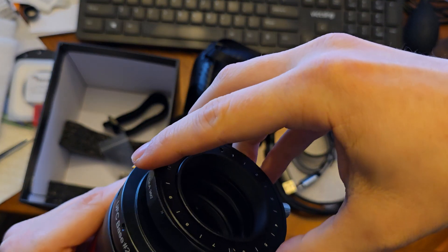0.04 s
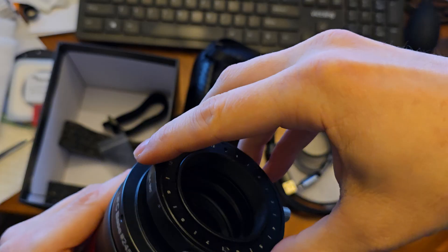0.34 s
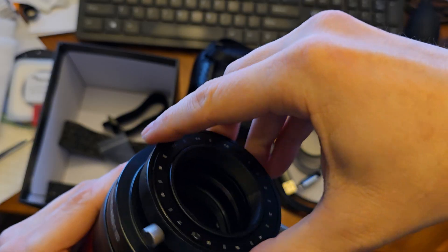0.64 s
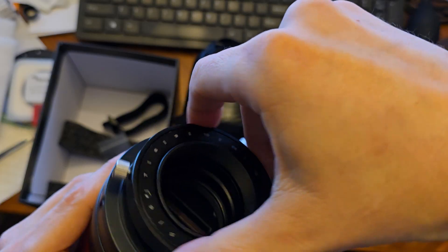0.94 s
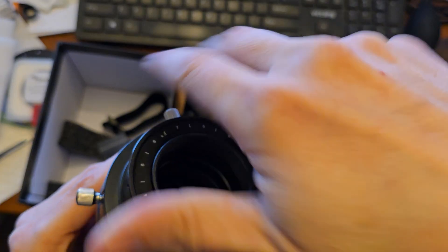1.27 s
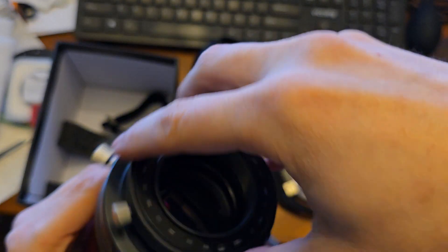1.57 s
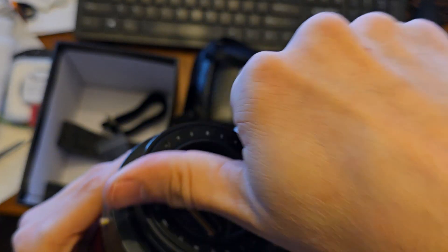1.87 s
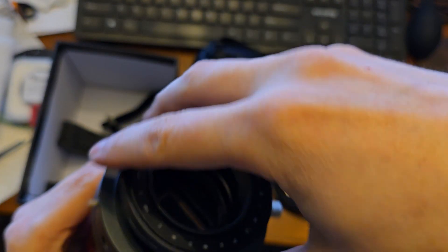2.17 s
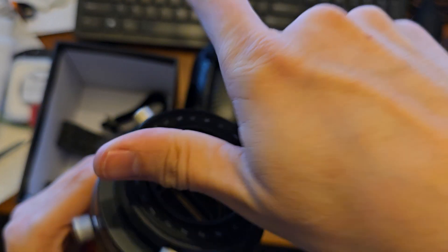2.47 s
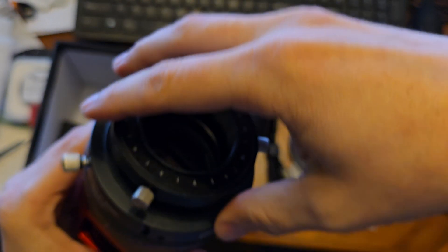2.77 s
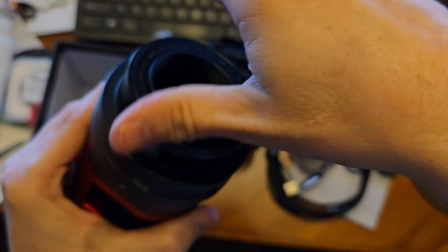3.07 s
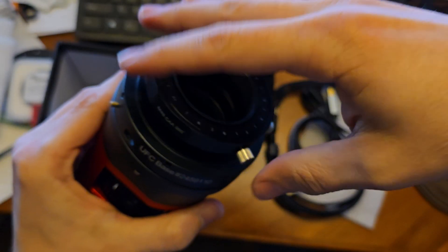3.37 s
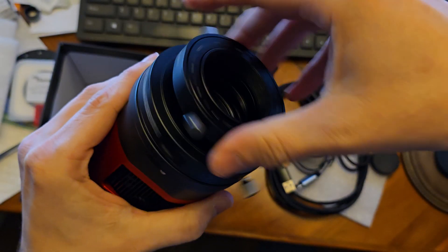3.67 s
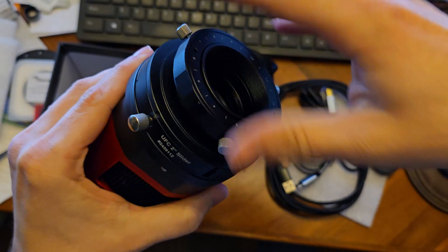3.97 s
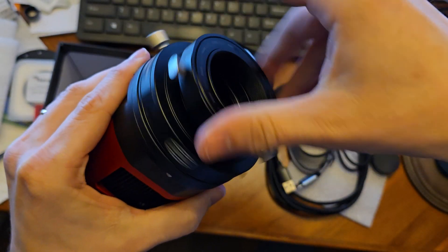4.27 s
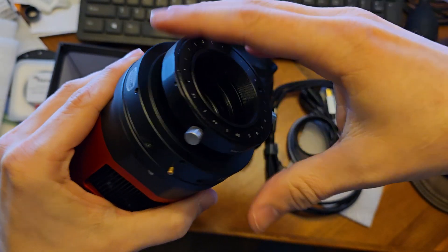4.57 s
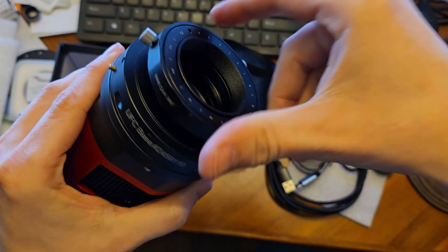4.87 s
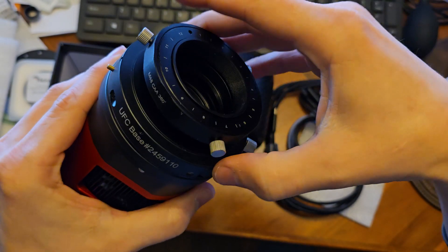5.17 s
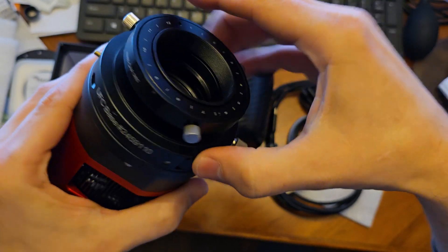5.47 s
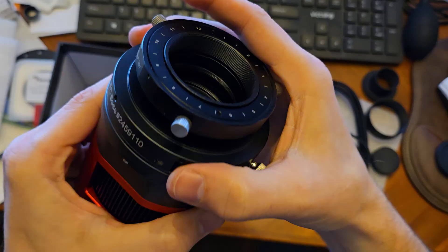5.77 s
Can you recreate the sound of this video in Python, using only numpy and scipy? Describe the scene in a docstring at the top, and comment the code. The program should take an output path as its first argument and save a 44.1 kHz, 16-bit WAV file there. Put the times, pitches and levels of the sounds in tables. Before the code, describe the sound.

Close, dry scraping of a metal ring twisted along its thread stroke after stroke, with small squeaks over a faint fan hum.

```python
"""Fingertips brush and tick on metal over the faint fan hum of a small, quiet room. Threaded adapters are
being screwed together by hand above a desk, close to the microphones of a small stereo camera.
The ring turns in eight strokes, chafing as it catches, then ends with a few short squeaks. Countless tiny
slips in the dry thread rasp, ring the barrel and sound the air in the tube, while the hollow under the
palm hums and groans. Between the later strokes the thumb slides lightly over the rim."""
import sys
import numpy as np
from scipy import signal
from scipy.fft import rfft, irfft, next_fast_len
from scipy.io import wavfile
from scipy.ndimage import uniform_filter1d

SR = 44100
rng = np.random.default_rng(int(sys.argv[2]) if len(sys.argv) > 2 else 0)


def transcribe(signal):
    """Save signal, clipped to [-1, 1], as a 16-bit WAV file at the path in sys.argv[1]."""
    frames = np.atleast_2d(signal).T
    limited = np.clip(frames, -1, 1)
    pcm = np.round(limited * 32767).astype(np.int16)
    wavfile.write(sys.argv[1], SR, pcm)


N = 261732
T = np.arange(N) / SR
FFT_SIZE = next_fast_len(N + SR // 20, True)
HZ = np.maximum(np.arange(FFT_SIZE // 2 + 1), 1) * SR / FFT_SIZE


def undb(db):
    """Decibels to gain."""
    return 10 ** (np.asarray(db) / 20)


def unit(x):
    """Scale to rms 1."""
    return x / np.sqrt(np.mean(x ** 2) + 1e-20)


def colour(points):
    """A (frequency [Hz], gain [dB]) table as gain at every frequency."""
    hz, db = np.transpose(points)
    return undb(np.interp(np.log(HZ), np.log(hz), db))


def resonance(hz, width_hz):
    """Response of one damped mode, gain 1 at its centre."""
    return 1 / (1 + 1j * (HZ ** 2 - hz ** 2) / (HZ * width_hz))


def through(x, response):
    """Filter a sound by a frequency response."""
    return irfft(rfft(x, FFT_SIZE) * response, FFT_SIZE)[:N]


def noise():
    """White noise."""
    return rng.standard_normal(N)


def drift(rate_hz):
    """Smooth random wander with rms 1."""
    steps = rng.standard_normal(N // 8)
    return unit(np.interp(2 * rate_hz * T, np.arange(len(steps)), steps))


def slips(per_s, spread_db):
    """Dense tiny impacts of uneven size, as rough spots of two surfaces let go."""
    return (rng.random(N) < per_s / SR) * noise() * undb(spread_db * noise())


def burst(x, shape, db):
    """Shape a sound in time so that its level is db where the shape is 1."""
    shaped = x * shape
    return shaped * undb(db) * np.sqrt(np.sum(shape ** 2) / (np.sum(shaped ** 2) + 1e-20))


def swell(at, half_s):
    """A touch that grows and lets go."""
    return np.exp(-.5 * ((T - at) / half_s) ** 2)


# Room tone at the microphones: (frequency [Hz], relative level [dB])
ROOM_TONE = [(25, -37.5), (85, -24.5), (210, -22), (270, -8), (450, -13.5), (700, -13), (1300, -19.5),
             (1700, -23), (3300, -26.5), (4300, -36), (5100, -34), (6000, -45), (9700, -51), (12000, -38.5),
             (15800, -41)]
# Hum of the fan in the background: (frequency [Hz], level [dB])
FAN_LINES = [(383.5, -70), (678, -78.5), (797, -81.5)]
def room():
    """Soft air noise, most alike at both microphones in the bass, and the wavering lines of a fan."""
    stereo_width = np.clip(HZ / 3000, .35, 1)
    mid = through(noise(), colour(ROOM_TONE))
    side = through(noise(), colour(ROOM_TONE) * stereo_width)
    air_db = -64.5 + 0.667 * drift(5.4)
    air = (mid + side * np.array([[1], [-1]])) / np.std(mid) * undb(air_db)
    hum = 0
    for hz, db in FAN_LINES:
        gain = undb(db + 3.6 * drift(8.2))
        phase = 2 * np.pi * np.cumsum(hz + 1.09 * drift(6)) / SR
        hum += gain * unit(np.sin(phase))
    return air + hum


# Modes of the metal barrel: (frequency [Hz], width [Hz], gain [dB])
BARREL_MODES = [(1970, 53, -15.5), (2310, 130, -4), (2540, 88, -14.5), (3710, 440, -2), (4826, 160, 2),
                (5090, 330, -4), (5240, 160, 3), (6600, 80, -22.5), (11880, 200, 6), (12400, 400, -13)]
def barrel():
    """Response of the barrel, all its modes together."""
    return sum(undb(db) * resonance(hz, width) for hz, width, db in BARREL_MODES)


# Fingertips shifting on the barrel, faint even this close: (time [s], half length [s], level [dB])
FINGER_RUSTLES = [(0.034, 0.023, -62.5), (0.179, 0.019, -71.5), (0.273, 0.012, -68), (0.436, 0.034, -61),
                  (0.575, 0.033, -64)]
def rustles():
    """Dry skin brushes the metal and barely rings it."""
    skin = through(slips(per_s=9000, spread_db=4.0), barrel())
    return sum(burst(skin, swell(at, half_s), db) for at, half_s, db in FINGER_RUSTLES)


# Nails and thumbscrews tick, the hand bumps the body: (time [s], level [dB], centre [Hz], decay [s])
HAND_TICKS = [(0.035, -50.5, 6920, 0.0044), (0.049, -54, 5860, .003), (0.29, -61.5, 106.6, 0.04),
              (0.38, -54, 7300, 0.011), (4.206, -54.5, 10900, .0066), (5.083, -39.5, 6100, 0.00067),
              (5.082, -51.5, 1660, 0.012), (5.09, -45.5, 5600, .004), (5.406, -54.5, 13900, 0.035)]
def ticks(rise_s=0.0021, width_share=0.61):
    """Light contacts that die away at once in the hand."""
    out, contact = 0, noise()
    for at, db, hz, decay_s in HAND_TICKS:
        shape = np.exp(-np.abs(T - at) / np.where(T < at, rise_s, decay_s))
        band = through(contact, resonance(hz, width_share * hz) ** 2)
        out += burst(band, shape, db)
    return out


def stick_slip(hz, width_hz):
    """A friction tone whose pitch and strength stray, held in by its mode."""
    phase = 2 * np.pi * np.cumsum(hz + .35 * width_hz * drift(width_hz)) / SR
    tone = np.sin(phase) * undb(4.7 * drift(width_hz))
    return through(tone, resonance(np.mean(hz), 1.85 * width_hz) ** 2)


# The ring catching, close to the microphones: (time [s], half length [s], level [dB], pitch [Hz],
# width [Hz], upper mode over squeak [dB], grit over squeak [dB])
CATCHES = [(0.424, 0.02, -49.5, 1350, 495, -31, -1), (0.568, 0.014, -58, 1343, 406, -31, -0.5),
           (0.726, 0.021, -50.5, 1280, 489, -3, 0.5), (0.806, 0.0099, -30, 1150, 627, -19, -6.5),
           (0.835, 0.012, -37.5, 1280, 473, -24, -7), (0.917, 0.027, -44, 1300, 453, -26, -6),
           (1.16, 0.019, -36.5, 1438, 498, -7.5, -9), (1.213, 0.0089, -38.5, 1388, 497, -25, -2),
           (2.274, 0.0046, -42, 1400, 404, -22, -21), (2.535, 0.011, -37.5, 1400, 395, -13.5, -10),
           (3.926, .012, -49, 1624, 498, -15, -3), (4.253, 0.02, -41.5, 1350, 453.5, -14, -12),
           (4.335, 0.023, -39.5, 1225, 500, -23, 1.5), (4.386, 0.0061, -40, 1233, 398, -4, 2.5),
           (4.9, 0.017, -42.5, 1240, 394, 5, 3.5), (4.967, 0.0063, -55.5, 1310, 400, 15, 19.5),
           (5.316, 0.0099, -34.5, 1208, 149.6, -12.5, -12.5), (5.339, .011, -30, 1137, 280, -10, -10),
           (5.432, 0.0083, -42, 1116, 181.5, -12.5, -16.5), (5.901, 0.0077, -37.5, 1134, 327.3, -8, -21.5),
           (5.922, 0.016, -34.5, 1195, 321, 1.5, -11)]
def squeaks():
    """When the ring catches, stick-slip drives one low mode."""
    return sum(burst(stick_slip(hz, width), swell(at, half_s), db)
               for at, half_s, db, hz, width, _, _ in CATCHES)


# Colour of the grit in a catch: (frequency [Hz], gain [dB])
GRIT_COLOUR = [(120, -35), (450, -8), (750, -9), (1800, 3), (2400, 2), (4000, 0), (5300, -1.5),
               (6500, -9.5), (10000, -13.5), (12000, -8), (15800, -14)]
def chafes():
    """The same catches shake an upper mode and shed some grit."""
    upper = through(slips(per_s=2200, spread_db=5.5), resonance(hz=3070, width_hz=800) ** 2)
    grit = through(slips(per_s=3000, spread_db=0.5), colour(GRIT_COLOUR))
    out = 0
    for at, half_s, db, _, _, upper_db, grit_db in CATCHES:
        shape = swell(at, half_s)
        out += burst(upper, shape, db + upper_db) + burst(grit, shape, db + grit_db)
    return out


# Tight spots in the thread slow the ring: (time [s], half length [s], speed lost [0-1])
THREAD_TIGHT_SPOTS = [(0.807, 0.054, 0.54), (1.703, 0.014, 0.1), (1.829, 0.02, 0.24), (2.384, 0.024, 0.08),
                      (2.478, 0.022, 0.06), (2.998, 0.024, 0.29), (3.742, 0.058, 0.25), (4.33, 0.018, 0.21),
                      (4.868, 0.024, 0.39), (4.928, 0.011, 0.38)]
def turning(start, up_s, down_s, wind_up_s=0.019, bite_s=0.052, stall_share=0.48):
    """Speed and sliding contact (both 0-1) of one stroke: the grip bites and holds until the turn stalls."""
    since = np.maximum(T - start, 0)
    rising = np.minimum(since / up_s, 1) ** 0.54 * (1 - np.exp(-since / wind_up_s))
    falling = np.clip(1 - (since - up_s) / down_s, 0, 1)
    drag = sum(lost * swell(at, half_s) for at, half_s, lost in THREAD_TIGHT_SPOTS
               if start < at < start + up_s + down_s)
    speed = rising * falling * np.clip(1 - drag, 0, 1)
    contact = (np.minimum(since / bite_s, 1) * np.minimum(falling / stall_share, 1)) ** 2
    return speed, contact


def weak_modes(spacing_hz, depth_db):
    """The many weak modes of the rings, as an uneven gain over frequency."""
    modes = rng.standard_normal(2000)
    return undb(depth_db * np.interp(HZ / spacing_hz, np.arange(len(modes)), modes))


def shifting_modes(judder, response, per_s, spread_db, rate_hz, detune=0.018, patchy_db=10):
    """Slips sound modes that the fingers detune and favour by turns; the level stays even."""
    out = 0
    for stretch in np.linspace(1 - detune, 1 + detune, 4):
        modes = np.interp(HZ * stretch, HZ, np.abs(response)) * weak_modes(spacing_hz=90.53, depth_db=4)
        out += through(judder * slips(per_s, spread_db), modes) * undb(patchy_db * drift(rate_hz))
    running_rms = np.sqrt(uniform_filter1d(out ** 2, size=SR // 50))
    return unit(out / running_rms)


# Turns of the wrist, close to the microphones: (time [s], speeding up [s], slowing down [s],
# relative scrape [dB], relative hiss [dB], relative ring [dB], scrape pitch [ratio],
# tube level [dB], tube pitch [Hz])
WRIST_TURNS = [ (0.634, 0.19, 0.21, -49, -41.5, -44.5, 0.96, -49, 2130),
               (0.948, 0.27, 0.057, -46.5, -44, -45, 0.95, -37, 2050),
               (1.56, 0.29, 0.18, -45.5, -30.5, -34.5, 0.92, -34.5, 2410),
               (2.243, 0.2, 0.27, -45, -30, -32, 0.98, -45, 2510),
               (2.862, 0.3, 0.25, -47, -33, -38, 0.95, -49, 2530),
               (3.586, .21, .28, -46, -30, -41, .96, -67, 2500),
               (4.205, 0.11, 0.3, -51.5, -33.5, -54.5, 0.893, -48.5, 3730),
               (4.743, 0.19, .095, -49.5, -33.5, -43, 0.96, -38.5, 3730)]
# Colours of the coarse scrape and the fine hiss: (frequency [Hz], gain [dB])
SCRAPE_COLOUR = [(150, -57), (280, -22), (390, -28), (490, -2.5), (620, -14), (800, -21), (1050, -2),
                 (1300, 3.5), (1520, 7), (1670, -1), (2000, 1), (3000, -8.5), (4300, -12.5), (7000, -25.5),
                 (16000, -47.5)]
HISS_COLOUR = [(900, -38.5), (1800, -1), (2550, 4), (3200, -2.5), (3800, 0), (4350, -5), (4750, 1.5),
               (5450, -0.5), (5850, 2.5), (7000, 1.5), (9200, -1.5), (10700, -5.5), (12200, -3),
               (13600, -7), (15800, -8)]
def thread_rasp(judder, motion, gain_db=3.5):
    """Slips in the thread give a coarse scrape on contact; with speed they hiss and ring the barrel."""
    coarse = judder * slips(per_s=8000, spread_db=1.5)
    hiss = shifting_modes(judder, colour(HISS_COLOUR), per_s=30000, spread_db=1.0, rate_hz=11)
    ring = shifting_modes(judder, barrel(), per_s=11000, spread_db=3, rate_hz=14)
    out = 0
    for (speed, contact), (_, _, _, scrape_db, hiss_db, ring_db, ratio, _, _) in zip(motion, WRIST_TURNS):
        free_modes = weak_modes(spacing_hz=93.4, depth_db=0.5)  # each grip leaves others free to ring
        scrape_colour = colour(np.array(SCRAPE_COLOUR) * [ratio, 1])
        scrape = unit(through(coarse, scrape_colour * free_modes))
        out += scrape * undb(scrape_db) * contact
        out += hiss * undb(hiss_db) * speed ** 2.66
        out += ring * undb(ring_db) * speed ** 2.25
    return out * undb(gain_db)


def tube_air(judder, motion, width_hz=650):
    """The rubbing sounds the half-closed tube, at a pitch that depends on the hand."""
    rubbing = judder * slips(per_s=6200, spread_db=12.5)
    return sum(burst(through(rubbing, resonance(hz, width_hz) ** 2), speed ** 2, db)
               for (speed, _), (*_, db, hz) in zip(motion, WRIST_TURNS))


# Groans from the hollow between palm and tube: (time [s], level [dB], pitch [Hz])
PALM_GROANS = [(1.654, -61.5, 493), (2.924, -51.5, 505), (3.67, -48.5, 439), (4.269, -46.5, 522),
               (4.362, -50, 499), (4.859, -58.5, 476)]
def palm_hollow(motion, hum_hz=451.0, hum_db=-67.5, groan_half_s=0.026, sag=0.055):
    """Air under the palm hums while the ring turns, and groans with sinking pitch as the hand closes."""
    sliding = sum(contact for _, contact in motion)
    out = burst(stick_slip(np.full(N, hum_hz), width_hz=85), sliding, hum_db)
    for at, db, hz in PALM_GROANS:
        sinking = 1 - sag * np.tanh((T - at) / groan_half_s)
        out += burst(stick_slip(hz * sinking, width_hz=65), swell(at, groan_half_s), db)
    return out


# The thumb on the rim between strokes: (time [s], half length [s], level [dB], pitch [Hz])
THUMB_SLIDES = [(3.414, 0.17, -64, 1357), (4.083, 0.081, -62.5, 1244)]
def thumb_slides():
    """Skin gliding on the rim draws a faint tone from it."""
    return sum(burst(stick_slip(hz, width_hz=320), swell(at, half_s), db)
               for at, half_s, db, hz in THUMB_SLIDES)


# Balance of the camera's two microphones: (frequency [Hz], left minus right [dB])
MIC_BALANCE = [(150, 1.5), (450, 2.5), (1200, 1), (2000, -3.5), (2600, -8.5), (3400, 1), (4200, 3.5),
               (5100, 12.5), (5700, 8), (7600, 13.5), (9400, 13), (12000, -4), (14300, -3.5), (15800, 3)]
# Paths round the hand to the right microphone: (frequency [Hz], scattered over direct sound [dB])
HAND_SCATTER = [(300, -6), (1400, -27), (2300, 4), (3400, -5.5), (5000, 26), (8000, 9), (15000, 31.5)]
def microphones(direct, scattered, tones, lag_s=0.00011):
    """Sound reaches the left port first; the right hears much of the treble by paths round the hand."""
    scatter, balance = colour(HAND_SCATTER), colour(MIC_BALANCE)
    lag = np.exp(-2j * np.pi * HZ * lag_s)
    direct_share = 1 / np.sqrt(1 + scatter ** 2)
    right = through(direct, lag * direct_share) + through(scattered, scatter * direct_share)
    right += through(tones, lag)
    equal_power = np.sqrt(2 / (1 + balance ** 2))
    return through(direct + tones, balance * equal_power), through(right, equal_power)


def reflections(x, t60_s, db, band_hz):
    """A dense cloud of echoes, from surfaces that return only one range of wavelengths."""
    t = T[:SR // 2]
    tail = rng.standard_normal(len(t)) * undb(-60 * t / t60_s)
    wet = signal.fftconvolve(x, tail / np.sqrt(np.sum(tail ** 2)))[:N]
    return undb(db) * signal.sosfilt(signal.butter(2, band_hz, "bandpass", fs=SR, output="sos"), wet)


def scene():
    """The handled rings, heard from close by over a cluttered desk in a small room."""
    judder = undb(0.24 * drift(45) + 0.87 * drift(250))  # the thread never slides evenly
    motion = [turning(start, up_s, down_s) for start, up_s, down_s, *_ in WRIST_TURNS]
    # both paths carry the same gestures, each with its own fine grain
    direct, scattered = (
        thread_rasp(judder, motion) + tube_air(judder, motion) + chafes() + rustles() + ticks()
        for _ in range(2))
    tones = palm_hollow(motion) + squeaks() + thumb_slides()
    close = microphones(direct, scattered, tones)
    desk = [reflections(x, t60_s=0.043, db=-6.0, band_hz=(2010, 15000)) for x in close]
    walls = [reflections(x, t60_s=0.42, db=-10.5, band_hz=(200, 6010)) for x in close]
    return undb(-0.46) * (np.array(close) + desk + walls) + room()


def record(dry):
    """The camera cuts the treble steeply above 15.9 kHz."""
    return signal.sosfilt(signal.ellip(12, .1, 80, 15900, fs=SR, output="sos"), dry)


dry = scene()
out = record(dry)
transcribe(out)
```